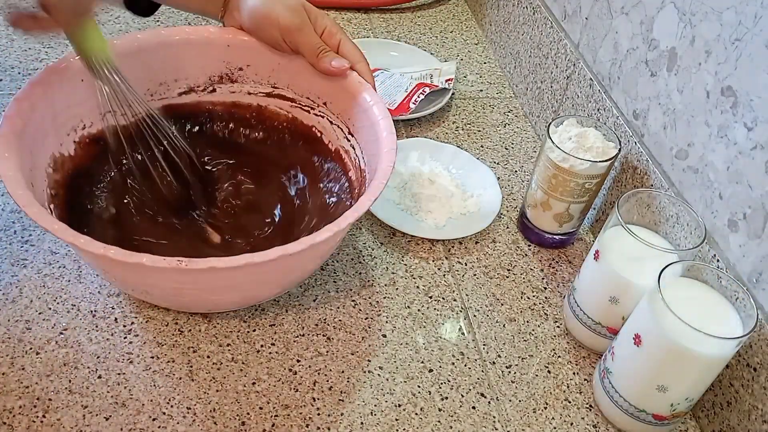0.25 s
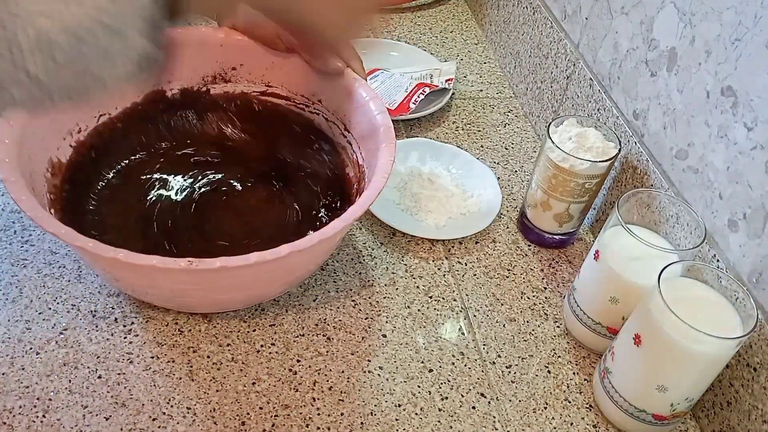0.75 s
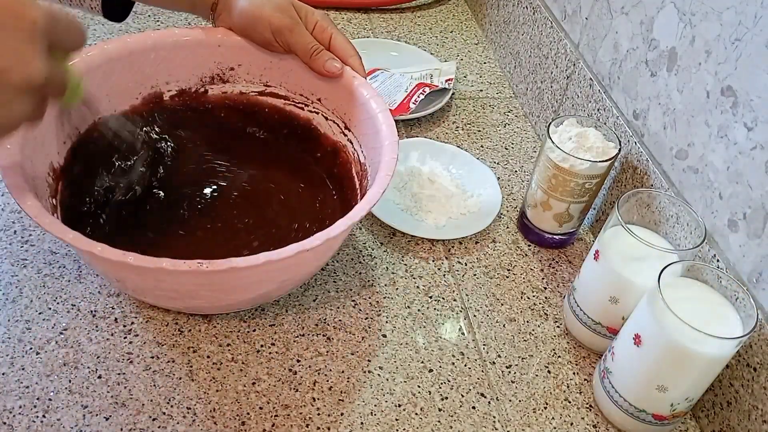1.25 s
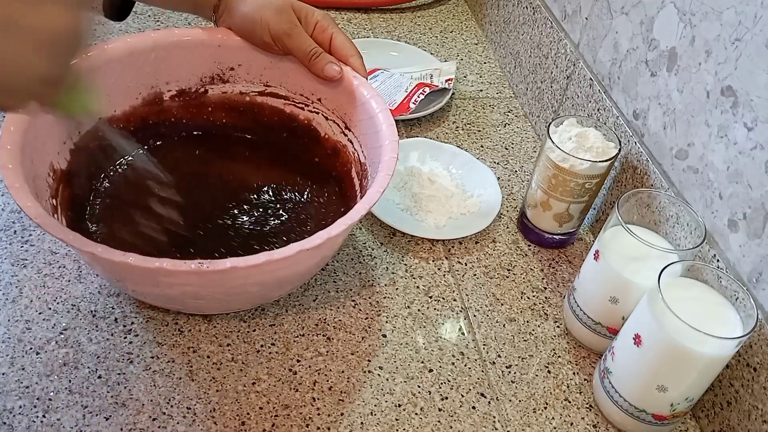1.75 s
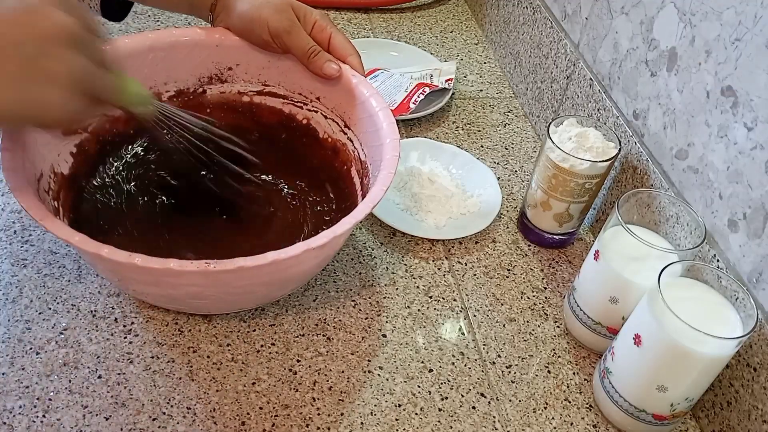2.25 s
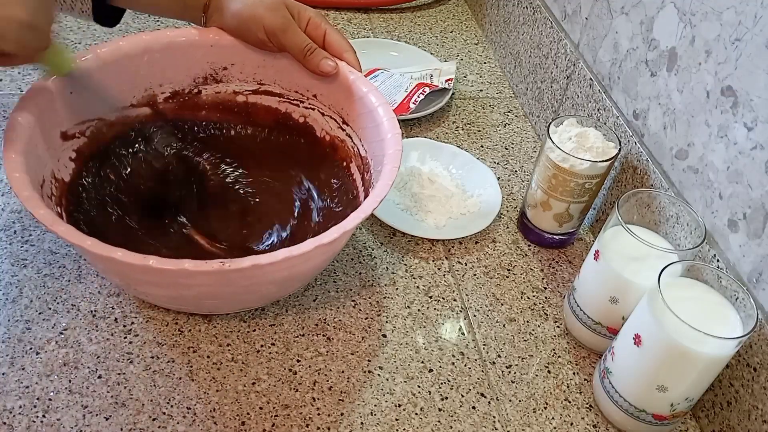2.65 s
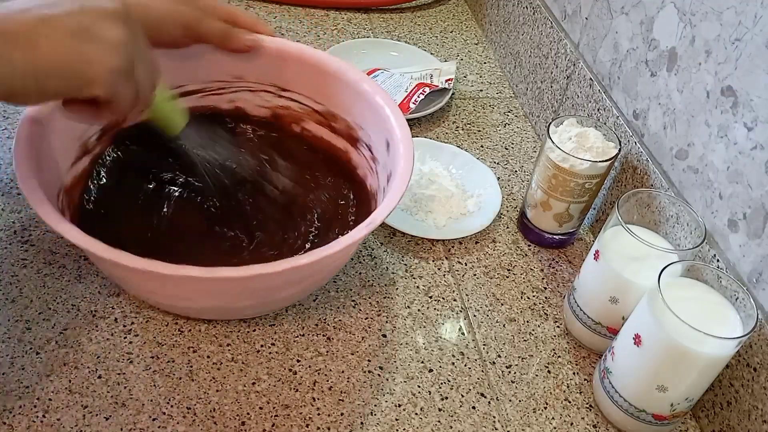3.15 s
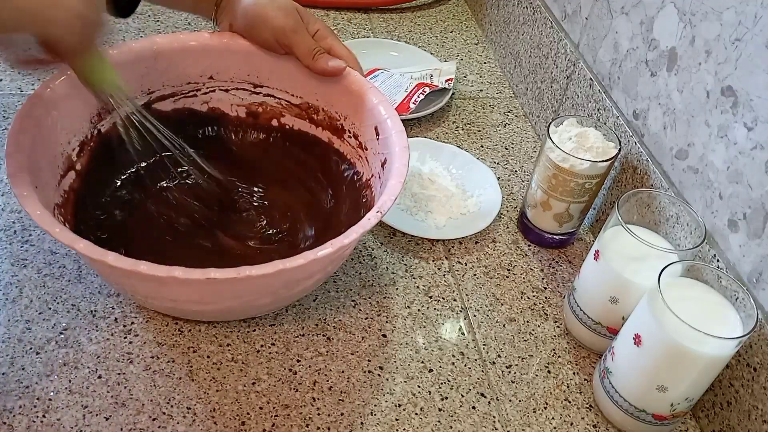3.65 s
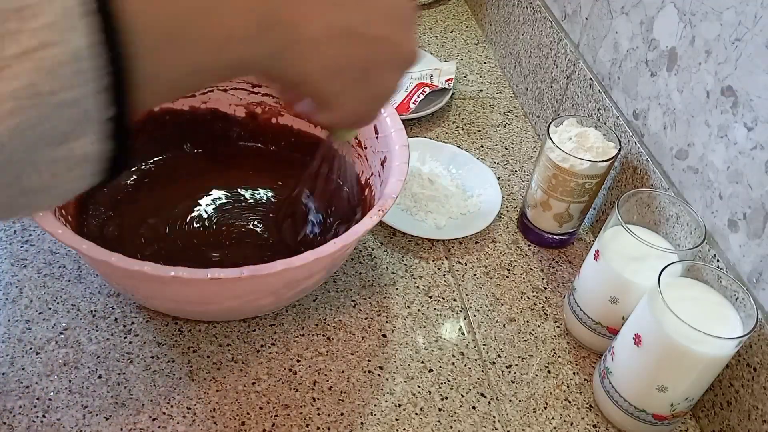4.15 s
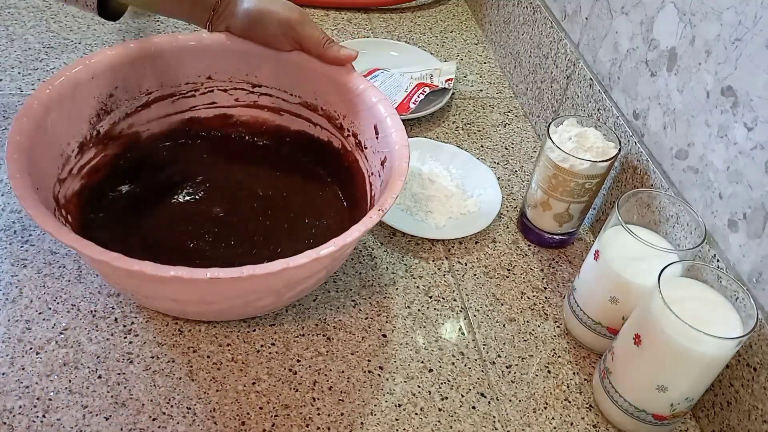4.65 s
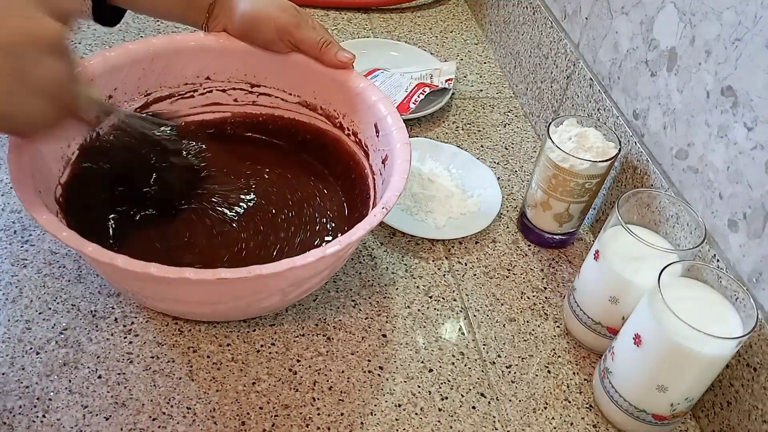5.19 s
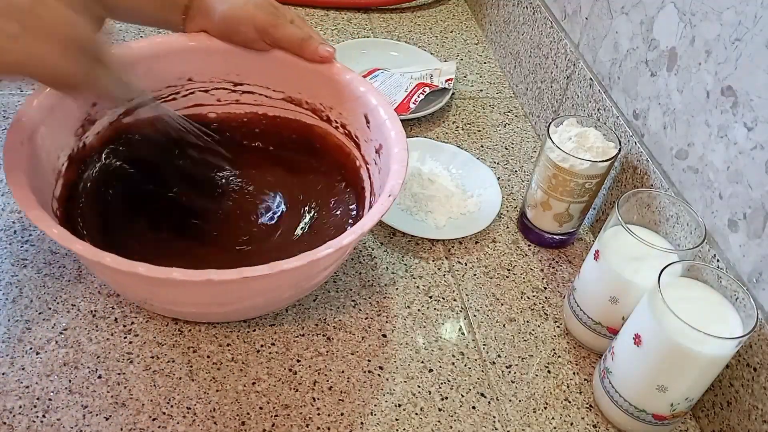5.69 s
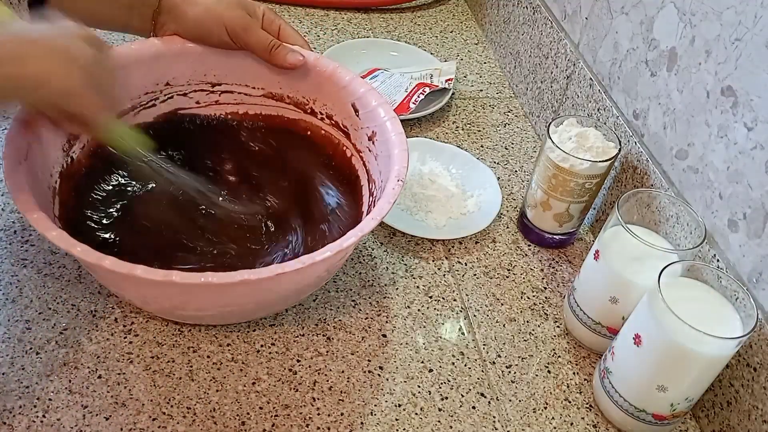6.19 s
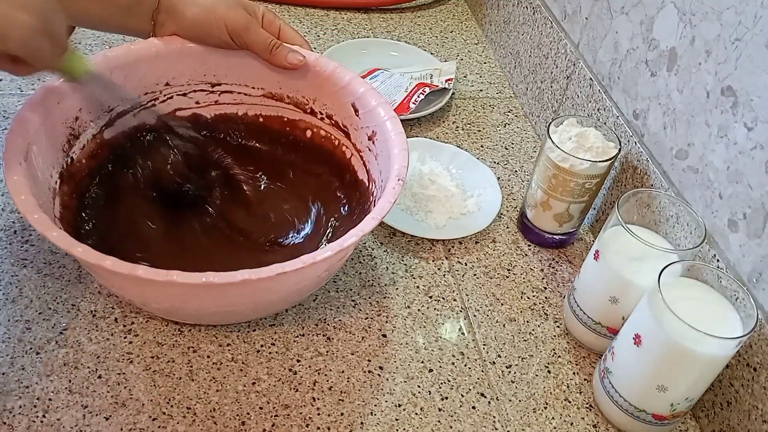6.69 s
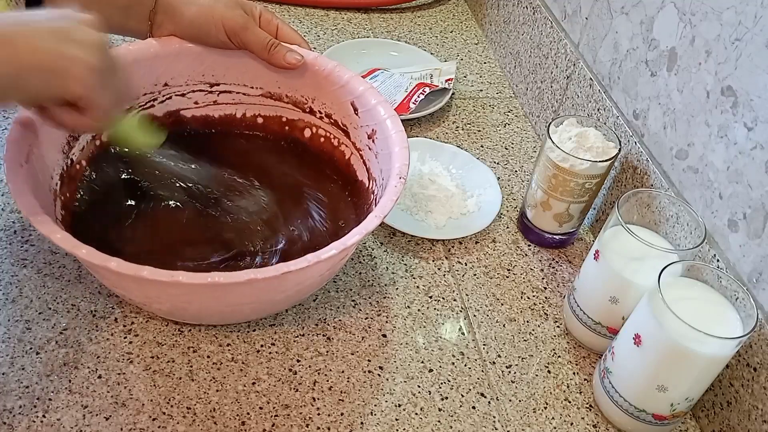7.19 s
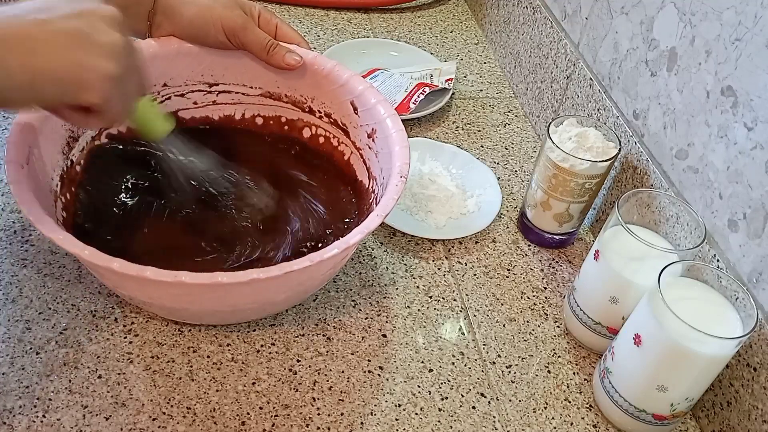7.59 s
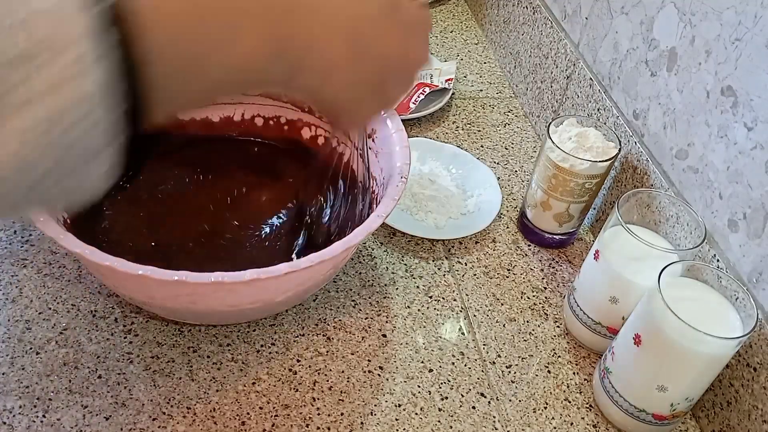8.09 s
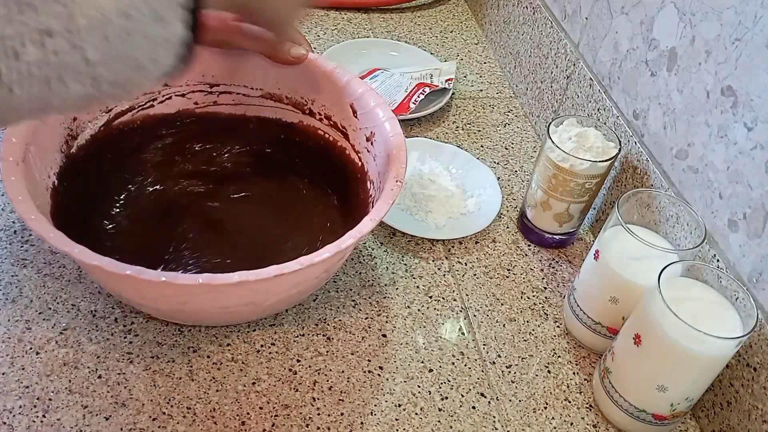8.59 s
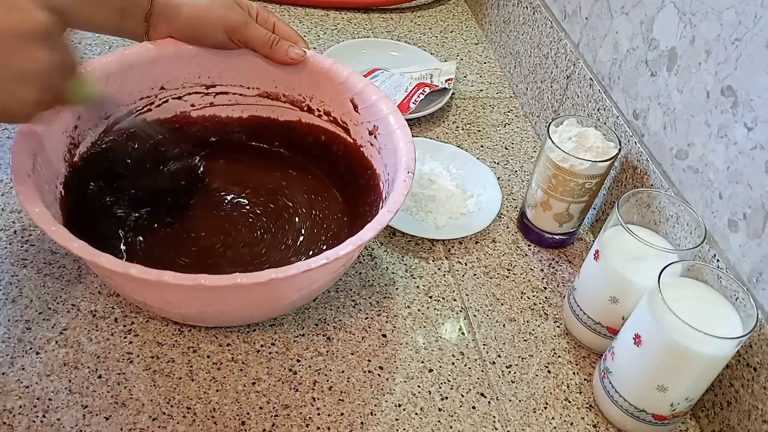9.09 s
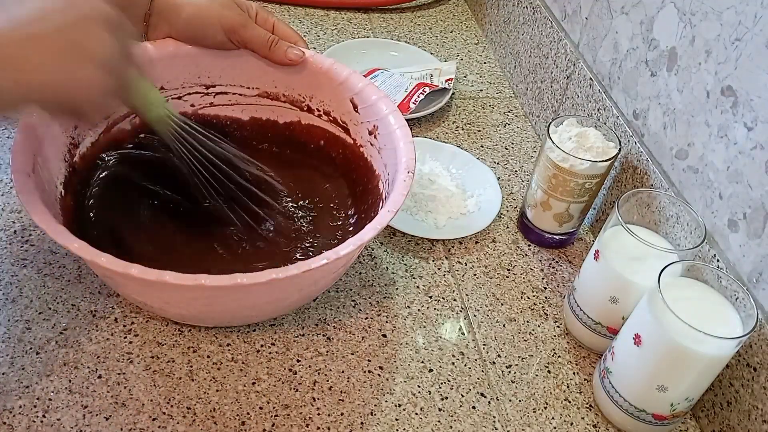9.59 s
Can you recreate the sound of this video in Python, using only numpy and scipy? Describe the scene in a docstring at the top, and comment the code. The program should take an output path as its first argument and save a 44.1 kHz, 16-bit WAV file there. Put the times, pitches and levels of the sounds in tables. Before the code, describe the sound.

A wire whisk works thick batter in a plastic bowl, heard close in a small hard kitchen. Uneven slaps clack on the wall and knock the bowl, each followed by a wet churning drag. Slower, softer sweeps come between busy runs of about five strokes a second. Air pockets plop with rising pitch, batter snaps off the wires, and the bowl judders on the counter once sharply midway.

```python
"""A wire whisk beats thick cake batter in a plastic bowl on a stone counter, about five strokes a second
at its busiest, with slower sweeps between. Each slap is a volley of clicks that rings the bowl and its wall.
The drag is random clicks shaped into churning, squelch and froth. Air pockets plop as short tones that rise,
batter snaps off the wires as filtered noise, and the bowl's foot judders on the counter as ringing slips.
A phone hears it close by in a small hard room, with a faint room tone."""
import sys
import numpy as np
from scipy import signal
from scipy.fft import rfft, irfft
from scipy.io import wavfile
from scipy.ndimage import uniform_filter1d

SR = 44100
rng = np.random.default_rng(int(sys.argv[2]) if len(sys.argv) > 2 else 0)


def dump(signal):
    """Clip the signal to [-1, 1] and save it as 16-bit WAV at the path in sys.argv[1]."""
    limited = np.clip(np.atleast_2d(signal).T, -1, 1)
    pcm = np.round(limited * 32767).astype(np.int16)
    wavfile.write(sys.argv[1], SR, pcm)


N = 433944
TIME = np.arange(N) / SR
HIT_TIME = TIME[:SR // 3]  # time inside one short sound

# Levels in the tables are starting levels: the functions trim them further.
# strokes, each a slap and then a drag: (start_s, wall clack_db, clack centre_hz, knock_db,
# thump of the bottom_db, wet spit_db, drag_db)
STROKES = [(0.0309, -39, 1400, -45, -54, -43.5, -60), (0.18, -44, 1220, -44, -51, -57, -56.5),
           (0.395, -39, 1290, -39.5, -38.5, -43, -52), (0.693, -45, 1780, -45.5, -62, -81, -62.5),
           (0.9993, -41.5, 2460, -62, -56, -54, -66), (1.144, -50.5, 2400, -48, -64, -57, -61),
           (1.4572, -48.5, 1830, -60, -70, -60, -65), (1.5693, -42, 2250, -50.5, -59, -46.5, -68),
           (1.6105, -39.5, 1030, -44, -68, -41.5, -58), (1.799, -42.5, 2380, -64, -52, -64, -51),
           (1.925, -43, 1590, -41.5, -43, -47, -59), (1.947, -39.5, 1120, -46, -41.5, -34, -70),
           (2.392, -46, 1360, -43.5, -56, -49.5, -71), (2.6126, -42, 1310, -44, -50, -39.5, -56),
           (2.7655, -54, 1340, -45, -51, -57, -53), (2.843, -50, 1400, -43, -43, -47.5, -60.5),
           (3.0365, -42, 2330, -47.5, -44, -48, -53.5), (3.1728, -42, 1660, -42, -53, -55, -49.5),
           (3.3767, -34.5, 1380, -34.5, -57, -43.5, -53), (3.5842, -33, 1060, -36, -65, -37.5, -50),
           (3.8064, -38.5, 1440, -42, -59, -51, -56.5), (4.1323, -63, 1060, -55, -62, -63, -77),
           (4.218, -44.5, 1440, -39.5, -54, -46, -80), (4.64, -61, 1860, -51, -54, -45.5, -72),
           (4.755, -52, 1830, -48, -59, -44, -71), (5.1367, -47.5, 1770, -48.5, -67, -57, -60.5),
           (5.2699, -54, 1080, -45.5, -57, -64, -58.5), (5.4217, -42, 1360, -50, -38.5, -49, -57),
           (5.4759, -29, 1100, -40.5, -32.5, -45.5, -72), (5.5029, -39, 1320, -43.5, -51, -44, -63),
           (5.7939, -37.5, 1450, -48.5, -63, -41.5, -52.5), (5.9827, -47, 1380, -47, -61, -45, -50),
           (6.1743, -43, 1530, -40, -45, -49.5, -51), (6.5805, -36, 1800, -40.5, -43, -40.5, -52.5),
           (6.7829, -39, 1810, -38, -40, -43, -54), (6.978, -39.5, 1300, -42, -43, -53, -53.5),
           (7.1781, -37.5, 1096, -39.5, -43, -44.5, -52), (7.3799, -38, 1860, -40, -63, -47.5, -49.5),
           (7.5785, -34.5, 900, -37, -38.5, -40, -54), (7.7873, -32.5, 1530, -36, -55, -41.5, -76),
           (8.6531, -51, 1290, -58, -51, -54, -61), (8.736, -48.5, 1220, -49.5, -60, -50, -66),
           (9.1374, -54, 1870, -52.5, -71, -68, -66), (9.399, -37, 930, -42.5, -44.5, -48, -53),
           (9.6217, -34, 910, -38.5, -50, -51, -50.5)]
# ringing tones of the loaded bowl and the air in it: (pitch_hz, level_db, time to fall 60 dB_s)
BOWL = [(101.5, -14, 0.23), (164.2, -17, 0.18), (186.5, -9, 0.15), (246, -9, 0.058), (338.3, -8, 0.15),
        (374, -9.5, 0.049), (488.8, -3.5, 0.13), (543.4, -2.5, 0.057), (621, -5.5, 0.032),
        (724.8, -6.5, 0.1), (765.5, 2, 0.031), (819.7, 0, 0.041), (1113, -22, 0.24), (1350, -9, 0.06)]


def amp(db):
    """Turn decibels into a gain."""
    return 10 ** (np.asarray(db) / 20)


def unit(x):
    """Scale to an average (rms) level of 1."""
    return x / np.sqrt(np.mean(x ** 2))


def burst(x, db):
    """Scale a short sound so that its loudest hundredth of a second has this level."""
    return x * amp(db) / np.sqrt(uniform_filter1d(x ** 2, size=441).max())


def fade(t60):
    """Die away exponentially, 60 dB down after t60 seconds."""
    return np.exp(-np.log(1000) * HIT_TIME / t60)


def band(x, lo_hz, hi_hz, order=2):
    """Keep mainly the sound between two frequencies."""
    return signal.sosfilt(signal.butter(order, [lo_hz, hi_hz], "band", fs=SR, output="sos"), x)


def colour(x, points):
    """Raise and lower parts of the spectrum along a curve of (pitch_hz, level_db) points."""
    hz, db = np.transpose(points)
    bins = np.fft.rfftfreq(x.shape[-1], 1 / SR)
    curve_db = np.interp(np.log(bins + 1), np.log(hz), db)
    return irfft(rfft(x) * amp(curve_db), x.shape[-1])


def ring(force, modes, scatter, detune):
    """Ring an object's tones with a force; the point of contact varies their strength, the batter their pitch."""
    answer = np.zeros(len(HIT_TIME))
    for k, (hz, db, t60) in enumerate(modes):
        strength_chance, pitch_chance = rng.uniform(-1.42, 1, 2)
        strength = (-1) ** k * amp(db) * (1 + scatter * strength_chance)
        pitch = hz * (1 + detune * pitch_chance)
        answer += strength * fade(t60) * np.sin(2 * np.pi * pitch * HIT_TIME)
    return signal.fftconvolve(force, answer)[:len(force)]


def clicks(rate, spread_db, size):
    """Scatter random clicks, rate a second, with strengths spread unevenly and either sign."""
    when, strength, sign = rng.random((3, size))
    level_db = spread_db * np.minimum(-np.log(1 - strength), 4)
    return (when < rate / SR) * amp(level_db) * np.sign(sign - .5)


def add(track, s, sound):
    """Mix a sound in at s seconds."""
    start = int(s * SR)
    track[start:start + len(sound)] += sound[:N - start]


def volley(spread_s, later_db, count=7):
    """One contact lands first; the others follow unevenly and more softly within spread_s."""
    force = np.zeros(len(HIT_TIME))
    lag, strength = rng.random((2, count))
    at = (lag * spread_s * SR).astype(int)
    force[at] = amp(later_db) * strength * (1 - lag / 2)
    force[0] = 1
    return force


def flutter(rate):
    """Wander smoothly at random, with a spread of 1 and rate steps a second."""
    steps = rng.standard_normal(2000)
    return unit(np.interp(TIME * rate, np.arange(len(steps)), steps))


def reflect(x, envelope, count=82):
    """Scatter sound along paths that keep changing as whisk and hands move."""
    hop = N // count + 1
    padded = np.pad(x, (hop, 2 * hop))
    # overlapping pieces, each with its own random echo
    pieces = np.array([padded[k * hop:(k + 2) * hop] for k in range(count + 1)])
    pieces = pieces * np.sqrt(np.hanning(2 * hop))
    paths = rng.standard_normal((count + 1, len(envelope))) * envelope
    paths /= np.linalg.norm(paths, axis=1, keepdims=True)
    out = np.zeros(N + 2 * SR)
    for k, echo in enumerate(signal.fftconvolve(pieces, paths, axes=1)):
        out[k * hop:k * hop + len(echo)] += echo
    return out[hop:hop + N]


def dragging(crest_s, sharpness):
    """Power of the drag after every slap: it builds to a crest and dies away as the whisk slows."""
    age = np.arange(SR // 2) / SR / crest_s
    swell = (age * np.exp(1 - age)) ** sharpness
    power = np.zeros(N)
    for s, *_, drag_db in STROKES:
        add(power, s, (amp(drag_db) * swell) ** 2)
    return power


def effort():
    """Gains of churn, squelch and froth: strokes and sweeps over a gentle stirring that sinks in the lifts."""
    # sweeps round the bowl: (middle_s, length_s, churn_db, squelch_db, froth_db)
    sweep_table = [(0.933, 0.17, -61, -58, -52.5), (1.016, 0.1, -57, -49.5, -52),
                   (1.108, 0.22, -61, -66, -57), (1.463, 0.41, -75, -63.5, -62.5),
                   (1.628, 0.11, -43, -41.5, -49), (1.794, 0.11, -51, -47, -52.5),
                   (1.945, 0.2, -49, -45, -47), (2.237, 0.056, -58.5, -84, -67),
                   (4.008, 0.076, -57.5, -66, -76), (4.43, 0.28, -84, -62.5, -55.5),
                   (4.597, .2, -59, -59, -58.5), (4.803, 0.26, -69, -51.5, -48.5),
                   (4.97, 0.37, -62, -64.5, -56), (5.685, 0.62, -55.5, -63.5, -65.5),
                   (6.326, 0.064, -51, -60, -54), (6.476, 0.26, -56, -58, -56),
                   (8.157, 0.37, -78, -81, -60), (8.417, 0.12, -74, -65, -58.5),
                   (8.61, 0.15, -65, -66, -63), (8.864, .35, -59, -65, -61)]
    # the whisk is lifted clear and the batter settles: (middle_s, length_s)
    lift_table = [(2.15, 0.22), (4.155, 0.28), (8.543, 0.067)]
    # the whisk merely moving in the batter: churn_db, squelch_db, froth_db
    stir_db = (-66, -69, -66.5)
    sweep_edge_db = -18.5  # level at both ends of a sweep, relative to its middle

    # squelch crests just before the churn, froth well after; decibels are relative to the drag
    strokes = np.array([dragging(crest_s=0.063, sharpness=1.9),
                        dragging(crest_s=0.057, sharpness=1.85) * amp(-7) ** 2,
                        dragging(crest_s=0.092, sharpness=5.5) * amp(-3) ** 2])
    sweeps = np.zeros((3, N))
    for middle_s, length_s, *levels_db in sweep_table:
        near = slice(int((middle_s - length_s) * SR), int((middle_s + length_s) * SR))
        arch = amp(sweep_edge_db * (2 * (TIME[near] - middle_s) / length_s) ** 2)
        sweeps[:, near] += np.outer(amp(levels_db), arch) ** 2
    lifted = np.max([np.clip(2 - np.abs(TIME - s) * 3 / length_s, 0, 1) for s, length_s in lift_table], axis=0)
    stirring = np.outer(amp(stir_db), amp(-12 * lifted)) ** 2
    return np.sqrt(strokes + sweeps + stirring)


def crackle(rate, spread_db):
    """Bubbles burst all over the surface, so each reaches the two ports with its own lag."""
    right, left = clicks(rate, spread_db, size=N), np.zeros(N)
    lags = np.round(6 + 9 * rng.standard_normal(N)).astype(int)  # samples
    np.add.at(left, np.clip(np.arange(N) + lags, 0, N - 1), right)
    return np.array([left, right])


def batter():
    """The wires drag through the batter: it churns in the bowl, squelches, and tiny bubbles burst."""
    # tone curves of the squelch and the froth: (pitch_hz, level_db)
    squelch_curve = [(300, -40), (700, 2), (1000, 6), (2000, 8), (4000, 2.5), (7000, -7.5), (14000, 2.5)]
    froth_curve = [(1000, 0.5), (3000, -3.5), (5000, 1), (7000, 1.5), (10000, 1.5), (16000, -4)]
    churn_gain, squelch_gain, froth_gain = effort()

    gulps = band(clicks(rate=170, spread_db=3.0, size=N), 31, 610, order=1)
    bowl_ring = unit(ring(gulps, BOWL, scatter=0.027, detune=.003))
    churn = unit(bowl_ring + amp(-8.0) * unit(band(gulps, 156, 650)))
    # crackle comes in clumps as one wire after another breaks the surface
    clumps = amp(3 * np.clip(flutter(150), -2, 2))
    # bigger pockets ring for a few cycles, each size at its own pitch
    pockets = np.zeros((2, N))
    for hz in 600 * 1.468 ** np.arange(7):
        one_size = band(crackle(rate=170, spread_db=-0.5), hz, hz * 1.53, order=1)
        pockets += unit(one_size) * np.sqrt(hz)
    squelch = unit(colour(pockets * clumps, squelch_curve))
    fizz = crackle(rate=9000, spread_db=1.0) * clumps ** .5
    froth = unit(colour(fizz, froth_curve))
    return amp(3.0) * churn_gain * churn + amp(1.5) * squelch_gain * squelch + amp(-1.0) * froth_gain * froth


def sprinkle(per_s, gain, range_db=8):
    """Place impulses at random moments, each up to range_db weaker than the gain at that moment."""
    when, softness = rng.random((2, int(per_s * N / SR)))
    at = (when * N).astype(int)
    out = np.zeros(N)
    out[at] = gain[at] * amp(-range_db * softness)
    return out


def stray_ticks():
    """Single wires graze the wall and lone bubbles pop, the louder the harder the whisk works."""
    _, squelch_gain, froth_gain = effort()
    crack, fizz = rng.standard_normal((2, len(HIT_TIME)))
    graze = burst(band(crack * fade(.03), 600, 4500), 3)
    pop = burst(band(fizz * fade(0.0079), 2500, 14000, order=1), 5.5)
    grazes = signal.fftconvolve(sprinkle(9, squelch_gain), graze)
    pops = signal.fftconvolve(sprinkle(10, froth_gain), pop)
    return (grazes + pops)[:N]


def room_tone():
    """A faint rumble shared by both sides under a thin hiss, made of filtered noise."""
    # tone curve of the quiet room: (pitch_hz, level_db)
    tone_curve = [(20, -6), (55, -16), (95, 8), (135, 8), (250, -10.5), (500, -1), (1000, -9.5),
                  (3000, -22.5), (15000, -29)]
    shared, left, right = rng.standard_normal((3, N))
    rumble = band(shared, 32, 420, order=1)
    hiss = band(np.array([left, right]), 350, 12000, order=1)
    return amp(-61.0) * unit(colour(rumble + hiss, tone_curve))


def taps():
    """Each slap knocks the bowl, thumps its bottom, clacks its upper wall and spits wet crackle."""
    # ringing tones of the bare upper wall: (pitch_hz, level_db, time to fall 60 dB_s)
    wall_modes = [(828, -10, 0.26), (848, 12.5, 0.15), (1060, -1, 0.027), (1085, 8, 0.13),
                  (1334, 13, 0.062), (1330, 3, 0.065), (1520, -36, 0.018), (1746, 9, 0.04),
                  (1950, -35, 0.034), (2155, 11, 0.051), (2400, 6, 0.048), (2950, 11, 0.055),
                  (3190, 8.5, 0.035), (3626, 14, 0.027)]
    out = np.zeros(N)
    for s, clack_db, clack_hz, knock_db, thump_db, spit_db, _ in STROKES:
        force = volley(spread_s=0.009, later_db=-3.5)
        body = ring(force, BOWL, scatter=.4, detune=.02)
        knock = burst(band(body, 226, 1210), knock_db + 5.5)
        thump = burst(band(body, 101, 298), thump_db)
        splat = unit(clicks(rate=6000, spread_db=5.5, size=len(force)) * fade(0.094))
        crack = unit(splat + amp(-6) * unit(force))
        # the soft plastic gives about as much dead crack as ring
        wall_ring = unit(ring(force, wall_modes, scatter=.5, detune=.015))
        wall = .85 * wall_ring + unit(band(crack, 600, 2600))
        # where the wires land decides which part of the clack stands out
        stand_out = unit(band(wall, clack_hz * .88, clack_hz * 1.14, order=1))
        clack = burst(unit(wall) + .8 * stand_out, clack_db - .5)
        spit = burst(band(crack, 890, 7100, order=1), spit_db + .6)
        add(out, s, knock + thump + clack + spit)
    return out


def plops(swell_s=0.0066, t60=0.05, glide=0.15):
    """A pocket of air swells, rings briefly with rising pitch and shakes the bowl."""
    # air pockets closing in the batter: (time_s, level_db, pitch_hz halfway up the glide's full span)
    plop_table = [(0.044, -33.5, 464), (0.182, -45, 332), (0.231, -38, 464), (0.483, -38.5, 495),
                  (2.634, -40, 511), (2.848, -38.5, 529), (3.011, -38, 503), (3.229, -37.5, 515),
                  (3.649, -35, 495), (3.666, -34.5, 513), (4.026, -40, 496), (5.19, -42, 535),
                  (5.359, -35.5, 504), (5.761, -34.5, 514), (5.899, -37.5, 480), (6.218, -33, 495),
                  (6.264, -42, 477), (6.324, -39, 464), (6.46, -38, 472), (7.017, -31.5, 480),
                  (7.386, -27.5, 502), (7.458, -31.5, 477), (7.522, -38, 520), (7.64, -36.5, 330),
                  (7.74, -42.5, 493), (8.6, -43.5, 486), (8.839, -45, 480), (9.267, -42.5, 523),
                  (9.771, -38, 522)]
    out = np.zeros(N)
    for s, db, hz in plop_table:
        pitch = hz * (1 + glide * (np.tanh(HIT_TIME / 0.011) - .5))
        swell = 1 - np.exp(-(HIT_TIME / swell_s) ** 2)
        pocket = np.sin(2 * np.pi * np.cumsum(pitch) / SR) * fade(t60) * swell
        push = band(volley(0.0121, later_db=-8.5), 36, 700, order=1)
        shake = ring(push, BOWL, scatter=0.074, detune=0.01)
        # the sound begins just ahead of the listed time
        add(out, s - .003, burst(unit(pocket) + amp(-3) * unit(shake), db - 4.5))
    return out


def snaps():
    """A film of batter tears off a wire: a sharp tick, a brief clink at its own pitch and a fizzing tail."""
    # sticky snaps: (start_s, level_db, centre_hz)
    snap_table = [(0.156, -53, 9000), (0.2727, -43, 3600), (1.6402, -38, 8900), (1.905, -44, 9400),
                  (1.927, -42, 10200), (1.9582, -35.5, 9350), (2.8375, -37, 4570), (3.035, -33.5, 3850),
                  (3.7698, -49.5, 9460), (4.533, -47, 10500), (4.788, -43, 10100), (4.8383, -40.5, 7500),
                  (5.501, -47, 2820), (5.621, -38, 3760), (6.059, -33.5, 2880), (6.102, -42, 9000),
                  (6.5326, -47, 10800), (6.888, -46, 4570), (7.008, -45.5, 2494), (7.4513, -39.5, 4000),
                  (8.1286, -51, 9600), (8.3442, -52, 10300), (9.5053, -41.5, 4500)]
    out = np.zeros(N)
    for s, db, hz in snap_table:
        tear = rng.standard_normal(len(HIT_TIME)) * (fade(.005) + .3 * fade(.06))
        clink = unit(band(tear, hz * .88, hz * 1.16, order=1))
        tick = unit(band(tear, hz * .55, hz * 1.7))
        add(out, s, burst(clink + 0.12 * tick, db - 2.5))
    return out


def bumps(judder_hz=95):
    """The full bowl is shoved: its foot sticks and slips about as fast as its base bounces."""
    # shoves of the bowl: (start_s, thud_db, chatter of the foot_db, length of the slip_s)
    bump_table = [(1.01, -52.5, -52, .02), (5.271, -47, -48, .04), (5.416, -43.5, -45, .02),
                  (5.475, -47, -39, .004), (5.488, -36, -33.5, .04), (7.023, -42.5, -41, .02),
                  (7.397, -44.5, -65, .02), (8.03, -49, -56, .06)]
    # flexing base of the full bowl, then its foot ring: (pitch_hz, level_db, time to fall 60 dB_s)
    base_modes = [(99.5, 2, 0.51), (165, -24, 0.52), (205, -10, 0.073), (273.4, -3.5, 0.1)]
    foot_modes = [(832, -6, 0.12), (900, -17, 0.021), (1010, 15, 0.047), (1220, -14, 0.055),
                  (1260, -23, 0.049), (1860, 10, 0.06), (2320, -12, 0.023)]
    out = np.zeros(N)
    for s, thud_db, chatter_db, slip_s in bump_table:
        slips = np.diff(np.floor(HIT_TIME * judder_hz), prepend=-1) * (HIT_TIME <= slip_s) * fade(0.16)
        grit = rng.standard_normal(len(HIT_TIME))
        thud = ring(band(slips, 36, 360, order=1), base_modes, scatter=0.093, detune=0.013)
        scrape = signal.fftconvolve(slips, fade(0.0045))[:len(slips)] * grit
        foot_ring = unit(ring(slips + 0.17 * scrape, foot_modes, scatter=0.15, detune=0.0068))
        chatter = foot_ring + .5 * unit(band(scrape, 250, 1700, order=1))
        add(out, s, burst(thud, thud_db) + burst(chatter, chatter_db))
    return out


def ports(x):
    """Blows reach the right port first; their treble also glances off the bowl's curved wall."""
    deep = signal.sosfilt(signal.butter(1, 900, fs=SR, output="sos"), x)
    bright = x - deep
    sides = []
    for lag in (6, 0):  # samples of delay, left then right
        direct = np.pad(deep + .55 * bright, (lag, 0))[:N]
        sides.append(direct + .8 * reflect(bright, fade(.018)[:SR // 20]))
    return np.array(sides)


def kitchen(x, room_db=-6, room_t60=0.22):
    """The small tiled room answers each side with its own short, coloured echo."""
    echo_curve = [(80, -15), (300, 3.0), (700, 0.0), (3000, 2.5), (15000, -3.5)]  # (pitch_hz, level_db)
    envelope = fade(room_t60) * (1 - fade(0.016))
    echo = np.array([reflect(side, envelope) for side in colour(x, echo_curve)])
    return amp([[-1.7], [-2.5]]) * (x + amp(room_db) * echo)


def scene():
    """Whisk, batter and bowl in the kitchen."""
    blows = taps() + plops() + snaps() + bumps() + stray_ticks()
    return kitchen(ports(blows) + batter()) + room_tone()


def record(dry):
    """The phone thins the deepest bass, its ports resonate in the high treble, and the top is cut."""
    # response of the phone's microphone: (pitch_hz, level_db)
    microphone_curve = [(20, -9), (50, -4), (85, 2), (1000, -3), (6500, 2), (8000, 4), (9300, 10),
                        (10500, 10), (12000, 3.5), (15500, 0)]
    top_cut = signal.ellip(10, .2, 70, 15900, fs=SR, output="sos")  # low-pass at 15900 Hz
    return signal.sosfilt(top_cut, colour(dry, microphone_curve))


dry = scene()
out = record(dry)
dump(out)
```